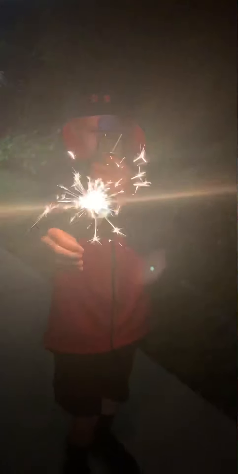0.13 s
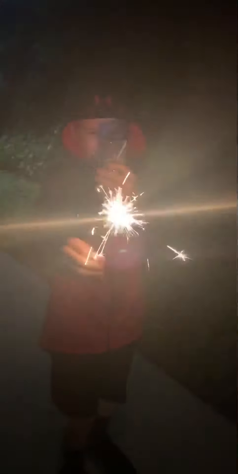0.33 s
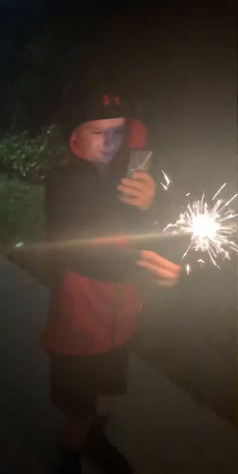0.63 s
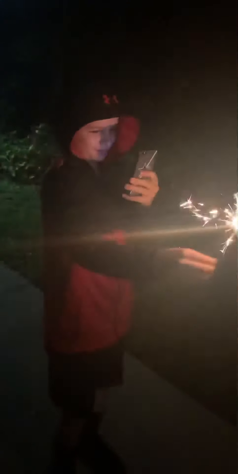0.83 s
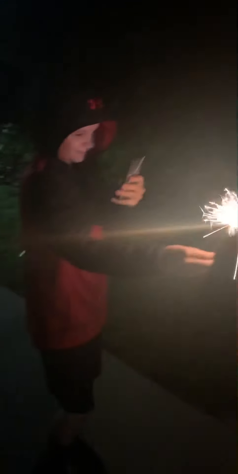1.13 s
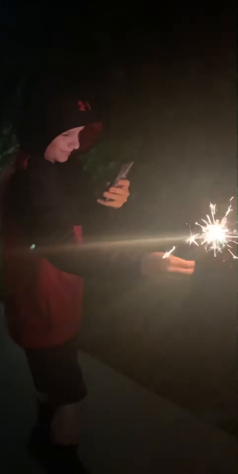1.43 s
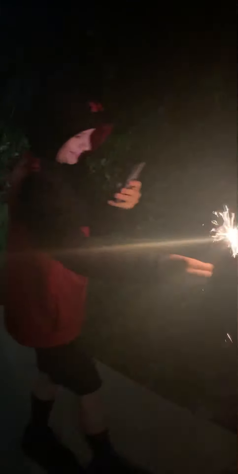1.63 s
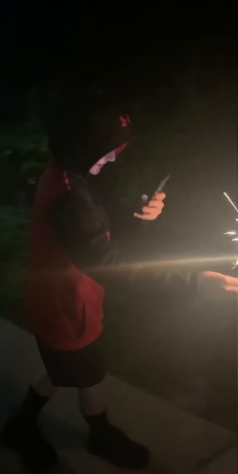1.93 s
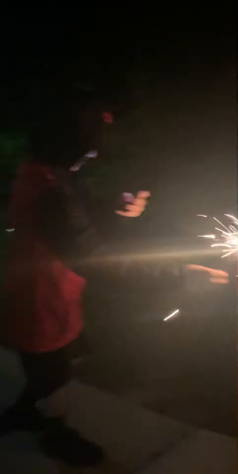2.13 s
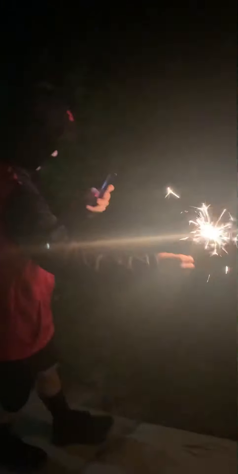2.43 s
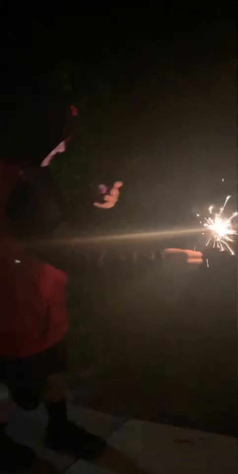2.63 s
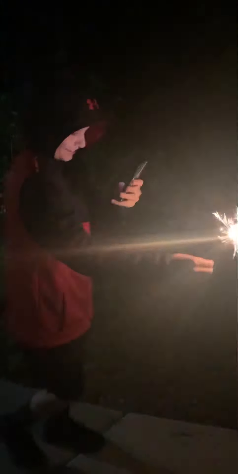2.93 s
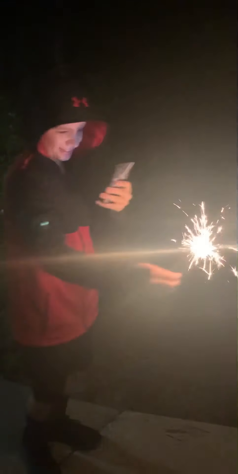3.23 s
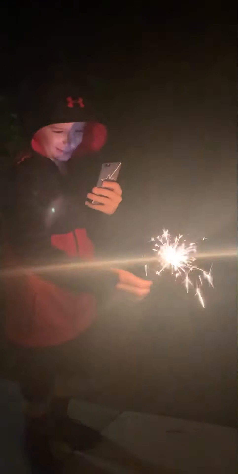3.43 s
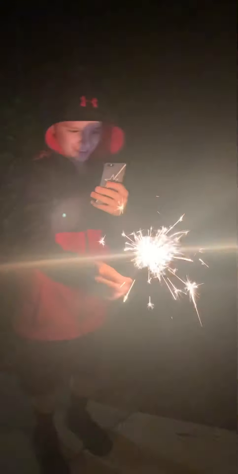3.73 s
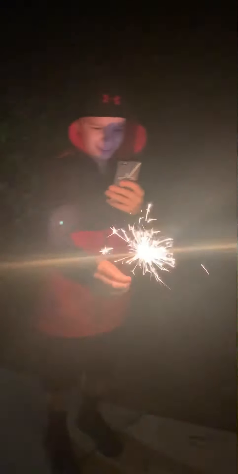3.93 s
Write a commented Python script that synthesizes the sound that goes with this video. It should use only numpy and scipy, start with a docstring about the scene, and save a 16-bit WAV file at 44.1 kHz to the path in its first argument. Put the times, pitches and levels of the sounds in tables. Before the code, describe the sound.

Close stereo phone pickup of a hand-held sparkler in open night air: continuous crisp sizzle, fluttering hiss and irregular sharp crackles. The burn weakens after one second, stays uneven, then surges at three seconds. Low distant rumble and wavering hum lie underneath, with muted handling thuds, a short rub, and a late loud pop.

```python
"""A hand-held sparkler fizzes close to a phone outdoors at night: random grain bursts over a gas hiss
are coloured into fizz, sizzle and flame rush, with clicks for pops and one flare of swelling sparks.
Far machinery is low rumble, wavering hum and a swelling drone; a short ping rings near the end.
Fingers tap and rub the phone, as falling tones and rustle in opposite phase on its two ports.
A suppressor ducks the middle tones of the sounds that the ports share while they do."""
import sys
import numpy as np
from scipy import signal
from scipy.fft import rfft, irfft
from scipy.io import wavfile
from scipy.ndimage import uniform_filter1d

SR = 44100
rng = np.random.default_rng(int(sys.argv[2]) if len(sys.argv) > 2 else 0)


def rack_gain(trim_db):
    """Turn a fader trim in dB into the linear factor to multiply a signal by."""
    fader = np.asarray(trim_db, float)
    return 10 ** (fader / 20)


def file_out(sig):
    """Save sig as 16-bit WAV at sys.argv[1]."""
    # one column per channel
    cols = np.atleast_2d(sig).T
    # limit, then scale
    lim = np.clip(cols, -1, 1)
    pcm = np.round(lim * 32767).astype(np.int16)
    wavfile.write(sys.argv[1], SR, pcm)


N = 180369
BINS_HZ = np.fft.rfftfreq(N, 1 / SR)

# vigour of the burn, as the level of the top sizzle: time_s [s], level_db [dB]
BURN = [(0.0, -48), (0.068, -47.5), (0.104, -50.75), (0.157, -48.5), (0.23, -47.5), (0.273, -50.5),
        (0.376, -48.5), (0.429, -52), (0.455, -50.5), (0.515, -51.5), (0.551, -48), (0.616, -47.5),
        (0.701, -53.5), (0.743, -50.5), (0.797, -53.5), (0.827, -54.5), (0.906, -57), (0.933, -53.5),
        (1.007, -56.5), (1.032, -58.5), (1.101, -50.5), (1.148, -55), (1.297, -49), (1.344, -50),
        (1.378, -54.5), (1.495, -51), (1.547, -54), (1.595, -56.5), (1.63, -55.5), (1.652, -56),
        (1.674, -58.25), (1.705, -56.5), (2.0, -53), (2.034, -58.25), (2.07, -59), (2.146, -61),
        (2.24, -58.5), (2.269, -59.5), (2.306, -54.75), (2.354, -59.5), (2.406, -52), (2.443, -53.5),
        (2.489, -59.25), (2.534, -58), (2.583, -61), (2.631, -54), (2.701, -58.5), (2.736, -61),
        (2.811, -54), (2.855, -57.5), (2.883, -54.5), (2.904, -55.5), (3.007, -53), (3.04, -49),
        (3.103, -48.5), (3.171, -49), (3.221, -51.75), (3.256, -49.5), (3.313, -49.25), (3.396, -52.75),
        (3.521, -49.5), (3.662, -50.5), (3.697, -47), (3.747, -49), (3.776, -54.5), (3.802, -49),
        (3.846, -49.25), (3.879, -52), (4.023, -48.5), (4.09, -49)]


def in_time(rows):
    """Read the columns of a table at every sample."""
    s, *columns = np.transpose(rows)
    return [np.interp(np.arange(N) / SR, s, column) for column in columns]


def rms_one(x):
    """Scale a sound to an rms of 1."""
    return x / np.sqrt(np.mean(x ** 2) + 1e-20)


def colour(x, spectrum):
    """Weight each frequency of a steady sound by a spectrum; the result has an rms of 1."""
    hz, level_db = np.transpose(spectrum)
    gain_db = np.interp(np.log(BINS_HZ + 1), np.log(hz), level_db, left=-90, right=-90)
    return rms_one(irfft(rfft(x) * rack_gain(gain_db), N))


def band(x, low_hz, high_hz):
    """Let through only the tones between two frequencies, without looking ahead."""
    edges_hz = [low_hz, min(high_hz, .45 * SR)]
    return signal.sosfilt(signal.butter(2, edges_hz, "band", fs=SR, output="sos"), x)


def drift(rate_hz):
    """Smooth noise twice, for a slow random wander of rms 1."""
    r = np.exp(-2 * np.pi * rate_hz / SR)
    noise = rng.standard_normal(N + SR)
    return rms_one(signal.lfilter([1], [1, -2 * r, r * r], noise)[SR:])  # drop the first second


def ring(clicks, hz, t60_s):
    """Each click sets off a sine that dies by 60 dB in t60_s."""
    r = rack_gain(-60 / (t60_s * SR))
    w = 2 * np.pi * hz / SR
    return signal.lfilter([0, np.sin(w)], [1, -2 * r * np.cos(w), r * r], clicks + 1e-18)


def click_at(s, level_db):
    """One sample stands up out of silence."""
    out = np.zeros(N)
    out[round(s * SR)] = rack_gain(level_db)
    return out


def swell(start_s, hold_s, peak_db, rise_db_s, fall_db_s):
    """A gain rises to its peak at start_s, holds and falls, in straight lines in dB."""
    t = np.arange(N) / SR - start_s
    return rack_gain(peak_db - rise_db_s * (-t).clip(0) - fall_db_s * (t - hold_s).clip(0))


def sparks(per_s, spread_db, hiss):
    """Iron grains burst at random in clumps, over a smooth gas hiss."""
    sizes = rack_gain(spread_db * np.minimum(rng.exponential(1, N), 3.7)) * rng.choice([-1, 1], N)
    born = rng.random(N) < per_s * rack_gain(3.0 * drift(40)) / SR
    return rms_one(sizes * born) + hiss * rng.standard_normal(N)


def sparkler():
    """One grain stream feeds fizz, sizzle and flame rush, each fluttering a little on its own."""
    # level of the lower fizz against the top sizzle: time_s [s], level_db [dB]
    fizz_level = [(0.0, -5.5), (0.95, -4.5), (1.15, -7), (1.5, -6), (1.75, -4), (2.4, -4.5), (3.2, -6),
                  (4.09, -6.5)]
    # gusts in the flame rush: time_s [s], level_db [dB]
    gusts = [(0.0, 0.5), (0.3, 1.7), (0.5, 0.9), (0.55, 3.5), (0.63, 2), (0.7, 0.4), (1.0, 0.8),
             (1.3, -0.8), (1.6, 1.8), (1.9, 2), (2.02, 2), (2.3, 3), (2.45, -0.5), (2.5, -2.5), (2.8, -0.1),
             (3.02, -1.2), (3.06, 4), (3.11, 1), (3.5, -0.1), (3.72, 1), (3.8, 0.3), (4.09, 0.5)]
    # spectra of the three colours: pitch_hz [Hz], relative_level_db [dB per Hz]
    fizz_spectrum = [(2000, -20), (3000, -4), (3600, -2), (4300, -2), (5000, 0), (6000, -1.5), (7300, 1),
                     (7900, -5), (9000, -25)]
    sizzle_spectrum = [(7000, -25), (7800, -4), (8300, 1), (9200, 0), (10200, 1.5), (12500, 0), (15500, -1),
                       (17000, -1)]
    rush_spectrum = [(300, -4.5), (500, 2.5), (1000, 2), (1400, 2.5), (2100, -1), (2600, -7), (3300, -12),
                     (4300, -14.5), (5000, -50)]

    burn_db, = in_time(BURN)
    grains = sparks(per_s=700, spread_db=3.3, hiss=1.9)
    grains = grains * rack_gain(1.3 * drift(90) + 0.3 * drift(15))

    fizz_db = burn_db + in_time(fizz_level)[0] + 1.0 * drift(14.0)
    fizz = rack_gain(fizz_db) * colour(grains, fizz_spectrum)
    sizzle = rack_gain(burn_db + 0.44 * drift(5.5)) * colour(grains, sizzle_spectrum)

    # the rush follows about half of the burn's swing in dB
    rush_db = -58 + in_time(gusts)[0] + 0.51 * (burn_db - burn_db.mean())
    rush_source = grains + 1.84 * rng.standard_normal(N)
    rush = rack_gain(rush_db + 1.4 * drift(22)) * colour(rush_source, rush_spectrum)
    return fizz + sizzle + rush


def opposite_hiss():
    """Faint treble hiss in opposite phase on the two ports follows the burn, 21 dB below it."""
    hiss = rms_one(band(rng.standard_normal(N), 2800, 15000))
    return rack_gain(in_time(BURN)[0] - 21) * hiss


def machinery():
    """Far machinery is coloured noise for rumble, a narrow noise drone and hum lines of unsteady pitch."""
    # level of the rumble: time_s [s], level_db [dB]
    rumble_level = [(0.0, -50), (0.7, -50.5), (1.4, -52), (2.0, -50), (2.35, -49.5), (2.47, -46),
                    (2.58, -50), (2.7, -49), (3.45, -49.5), (3.6, -49), (4.09, -47.5)]
    # colour of the rumble: pitch_hz [Hz], relative_level_db [dB per Hz]
    rumble_spectrum = [(22, -34), (30, -36), (34, -42), (37, -4.5), (45, -9), (62, -2), (87, 1.5),
                       (120, -4.5), (165, -6), (210, -10), (290, -10), (400, -16), (500, -20.5), (700, -24),
                       (900, -24)]
    # swells of the drone near 400 Hz: peak_s [s], peak_db [dB], fade_either_side [dB per s]
    drone_swells = [(0.11, -64.5, 125), (1.95, -55.5, 45), (2.22, -61, 83), (3.99, -49.5, 77)]
    # hum lines: pitch_hz [Hz], level_db [dB rms], pitch_wander_hz [Hz]
    hum_lines = [(86.5, -60, 5.34), (239.5, -55, 0.55), (355.2, -66.5, 1.11)]

    rumble_db = in_time(rumble_level)[0] + 0.79 * drift(3.5)
    out = rack_gain(rumble_db) * colour(rng.standard_normal(N), rumble_spectrum)

    drone_gain = rack_gain(-71) + sum(swell(s, 0, db, fade, fade) for s, db, fade in drone_swells)
    drone = band(band(rng.standard_normal(N), 360.0, 435), 360.0, 435)
    out += drone_gain * rms_one(drone)

    for hz, db, wander_hz in hum_lines:
        phase = 2 * np.pi * np.cumsum(hz + wander_hz * drift(5.4)) / SR
        out += rack_gain(db + 0.7 * drift(18.0)) * np.sqrt(2) * np.sin(phase)
    return out


def air_noise():
    """Air noise is a coloured random stream whose level wanders slowly."""
    # colour of the air noise: pitch_hz [Hz], relative_level_db [dB per Hz]
    air_spectrum = [(30, 1), (60, -8), (150, -1), (350, -11), (700, 2.5), (1200, -28), (1700, -40),
                    (2100, -7), (2700, -13), (3200, -22), (4500, -33)]
    return rack_gain(-65 + 1.0 * drift(3.1)) * colour(rng.standard_normal(N), air_spectrum)


def pops():
    """A bursting spark is a pressure spike, close echo and faint hiss, leaning slightly left or right at random."""
    # the loudest spark pops: start_s [s], level_db [dB], low_edge_hz [Hz], high_edge_hz [Hz]
    pop_rows = [(0.0401, -25, 1200, 15000), (0.085, -26, 5000, 15000), (0.297, -40, 800, 5000),
                (0.3468, -25, 5000, 16000), (0.3786, -26, 5000, 16000), (0.4441, -27, 6000, 15000),
                (0.5493, -21, 600, 10000), (0.608, -19, 1800, 3200), (0.7023, -28, 3000, 15000),
                (0.7195, -34, 800, 9000), (0.7385, -28, 800, 12000), (0.8193, -22, 3500, 18000),
                (1.094, -31, 3000, 15000), (1.1757, -27, 5000, 16000), (1.4186, -29, 5000, 16000),
                (1.4376, -27, 6000, 15000), (1.5335, -30, 3000, 15000), (1.5618, -29, 2000, 15000),
                (1.5939, -30, 5000, 16000), (1.6459, -30, 4000, 16000), (1.7831, -32, 5000, 16000),
                (1.8702, -26, 6000, 16000), (1.9596, -26, 900, 12000), (2.042, -33, 8000, 16000),
                (2.068, -30, 5000, 16000), (2.1048, -36, 5000, 16000), (2.2833, -28.5, 400, 12000),
                (2.3991, -28, 6000, 16000), (2.4709, -33, 5000, 16000), (2.5999, -30, 5000, 16000),
                (2.7139, -30, 7000, 16000), (3.0755, -26, 3000, 14000), (3.305, -31, 1000, 8000),
                (3.4907, -26, 6000, 15000), (3.7975, -18, 1200, 17000), (3.8537, -26, 3000, 15000),
                (3.9712, -26, 5000, 16000)]
    # bounce off the hand and the case: delay_s [s], level_db [dB]
    echo_s, echo_db = (0.00025, -6)

    t = np.arange(200) / SR
    shapes = rng.standard_normal((len(pop_rows), 200)) * 0.1 * np.exp(-t / 0.0013)
    shapes[:, :2] = [-.45, .9]  # the spike
    lag = round(echo_s * SR)
    shapes[:, lag:lag + 2] += rack_gain(echo_db) * np.array([.9, -.45])

    out = np.zeros((2, N))
    sides = rng.choice([-1, 1], len(pop_rows))  # 1 is left, -1 is right
    for (s, db, low_hz, high_hz), shape, side in zip(pop_rows, shapes, sides):
        pop = band(np.pad(shape, (0, 200)), low_hz, high_hz)
        lean_db = side * 2.0 / 2  # half of the lean goes to each port
        out[0] += np.convolve(click_at(s, db + lean_db), pop)[:N]
        out[1] += np.convolve(click_at(s, db - lean_db), pop)[:N]
    return out


def fingers():
    """A tap bends the case: the highs come first, the pitch falls to a thud; skin rustles after."""
    # finger taps on the case: start_s [s], level_db [dB], thud_hz [Hz], decay_s [s]
    tap_rows = [(1.67, -43, 285, 0.0074), (2.044, -47, 330, 0.0051), (2.368, -47.5, 380, 0.0027),
                (2.401, -45.5, 420, 0.0022), (3.236, -54.5, 295, 0.0046), (3.257, -48, 407, 0.0019),
                (3.442, -46, 330, 0.0036)]
    # finger rub: start_s [s], length_s [s], level_db [dB], edge_slope [dB per s]
    rub_rows = [(3.33, 0.09, -57, 497)]

    t = np.arange(round(.08 * SR)) / SR
    out = np.zeros(N)
    rustle_gain = sum(swell(s, length_s, db, edge, edge) for s, length_s, db, edge in rub_rows)
    for s, db, hz, decay_s in tap_rows:
        glide_hz = hz * (0.65 + 9.1 * np.exp(-t / 0.00074))
        tone = np.sin(2 * np.pi * np.cumsum(glide_hz) / SR)
        shape = (1 - np.exp(-t / 0.0021)) * np.exp(-t / decay_s)
        shape = shape * (1 + 0.012 / decay_s)  # short taps are lifted
        out += np.convolve(click_at(s, db), shape * tone)[:N]
        rustle_gain += np.convolve(click_at(s, db - 10), np.exp(-t / (6.0 * decay_s)))[:N]
    return out + rustle_gain * rms_one(band(rng.standard_normal(N), 350, 1800))


def suppress(shared, handling):
    """The handling level, held with a release, pulls down the middle band of the shared sound."""
    threshold_db, depth_db, release_db_s = -62, 24, 330
    centre_hz, octaves = 950, 1.18
    level_db = 10 * np.log10(uniform_filter1d(handling ** 2, size=800).clip(1e-12))

    # the held level jumps up at once and falls no faster than the release
    ramp = release_db_s * np.arange(N) / SR
    held_db = np.maximum.accumulate(level_db + ramp) - ramp

    cut_db = np.clip(2 * (held_db - threshold_db), 0, depth_db)
    gain = uniform_filter1d(rack_gain(-cut_db), size=400)
    gain = np.roll(gain, -round(.006 * SR))  # it acts 6 ms ahead
    off_centre = np.log2(BINS_HZ / centre_hz + 1e-9) / octaves
    middle = irfft(rfft(shared) * np.exp(-off_centre ** 4), N)
    return shared + (gain - 1) * middle


def flare():
    """A lump of coating catches at once, swells and dies fast."""
    # flare of the coating: start_s [s], swell_s [s], peak_db [dB], dying [dB per s]
    flare_rows = [(3.027, 0.019, -39.5, 450)]
    # band of the flare: low_edge_hz [Hz], high_edge_hz [Hz]
    flare_band = (2800, 10000)

    gain = np.zeros(N)
    for s, swell_s, db, dying_db_s in flare_rows:
        caught = np.arange(N) > s * SR
        gain += swell(s + swell_s, 0, db, 200.0, dying_db_s) * caught
    grains = band(sparks(per_s=1800, spread_db=3.5, hiss=0.8), *flare_band)
    return gain * rms_one(grains * rack_gain(2.0 * drift(200)))


def ping():
    """Two soft touches in quick succession ring three close modes."""
    # touches: start_s [s], level_db [dB]
    touches = [(4.0057, -40.5), (4.0105, -36)]
    # ringing modes: pitch_hz [Hz], level_db [dB], t60_s [s]
    modes = [(1700, -7, 0.028), (2010, -4.5, 0.034), (2145, 1, 0.035)]
    touch = band(sum(click_at(s, db) for s, db in touches), 1630, 2230)
    return sum(rack_gain(db) * ring(touch, hz, t60_s) for hz, db, t60_s in modes)


def port_pair(x):
    """Both ports hear the sound with their own phase and level, the right one later in the treble."""
    # the port pair: pitch_hz [Hz], left_lead [radians], left_over_right_db [dB]
    port_rows = [(0, 0, -0.5), (266, 0, 3.5), (415, 0.99, 2.5), (860, -1.0, -1), (1090, -1, -2),
                 (1560, 1, -0.5), (2470, 0, -3), (3100, 1.81, -2.5), (4060, 2, 2), (4475, 3, -1.5),
                 (16500, 20.5, 1)]
    hz, lead, balance_db = np.transpose(port_rows)
    half_turn = np.exp(.5j * np.interp(BINS_HZ, hz, lead))
    half = half_turn * rack_gain(.5 * np.interp(BINS_HZ, hz, balance_db))
    return irfft(rfft(x) * np.array([half, 1 / half]), N)


def scene():
    """Add the shared sound through the ports to the pops and to what is opposite at the two ports."""
    handling = fingers()
    shared = sparkler() + flare() + ping() + machinery()
    shared = suppress(shared, handling)
    opposite = handling + air_noise() + opposite_hiss()
    # the pops as a whole lean left by 2 dB
    leaning_pops = port_pair(pops()) * rack_gain(2 * np.array([[.5], [-.5]]))
    return port_pair(shared) + leaning_pops + opposite * [[1], [-1]]


def low_pass(x):
    """Removes everything above the highest recorded frequency."""
    return signal.sosfilt(signal.butter(12, 16990, fs=SR, output="sos"), x)


def record(dry):
    """Everything from 15750 Hz up is cut away from the finished mix."""
    mix = irfft(rfft(dry) * (BINS_HZ < 15750), N)
    return low_pass(mix)


dry = scene()
out = record(dry)
file_out(out)
```